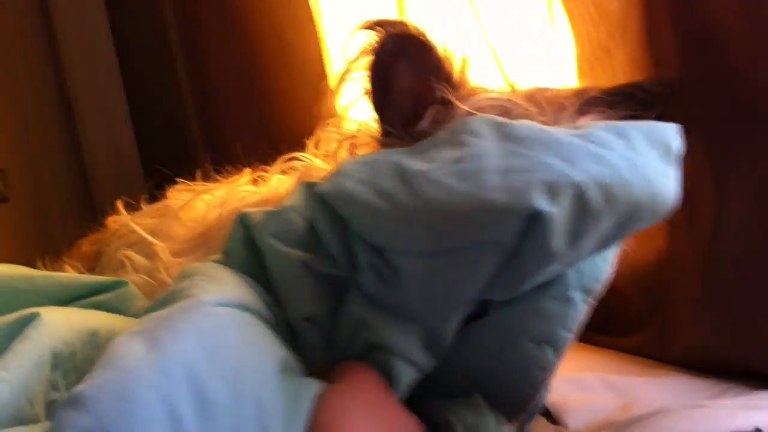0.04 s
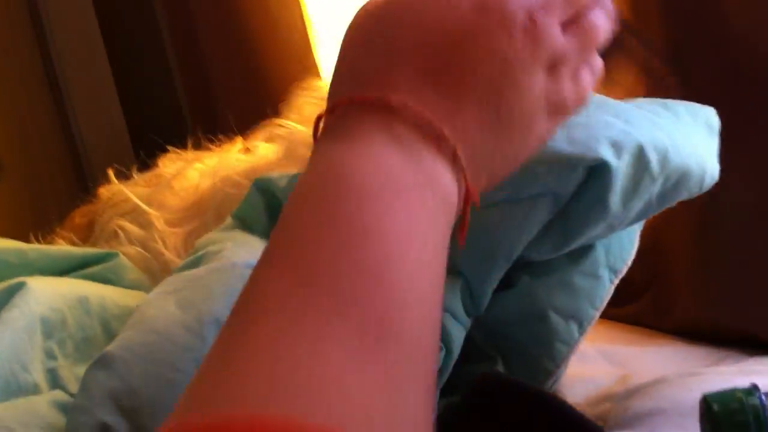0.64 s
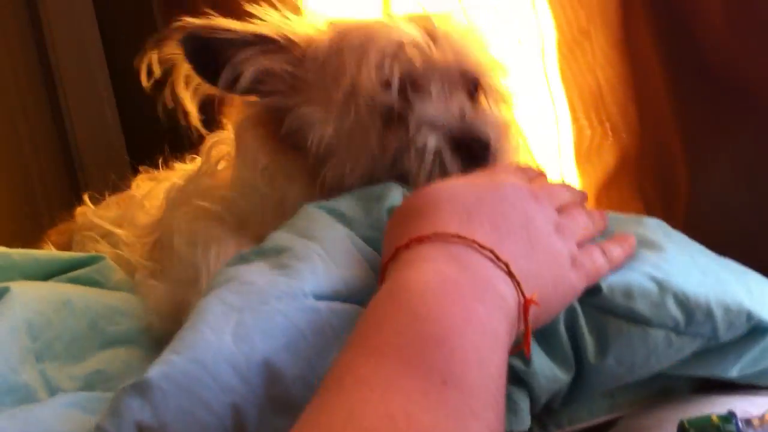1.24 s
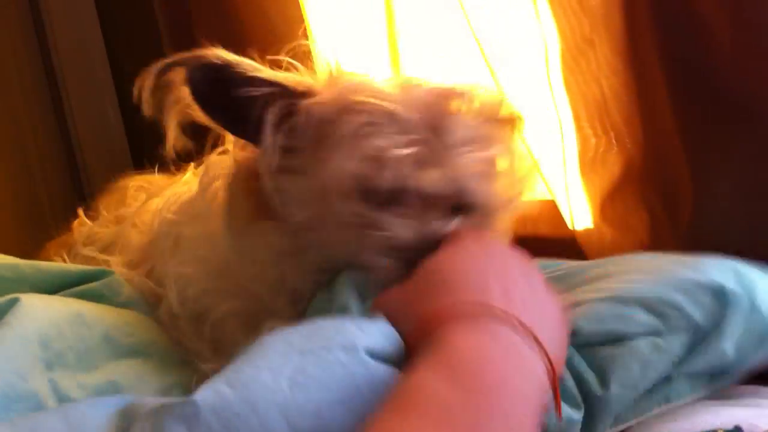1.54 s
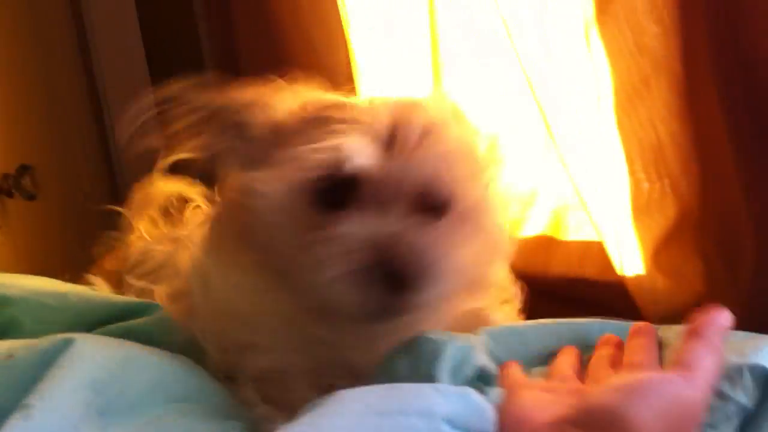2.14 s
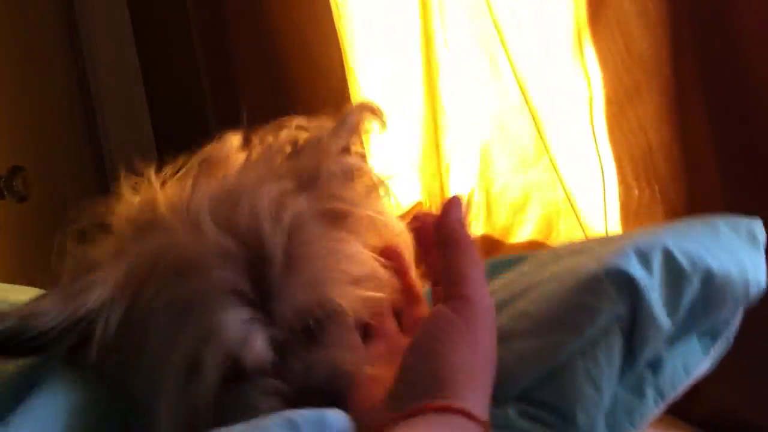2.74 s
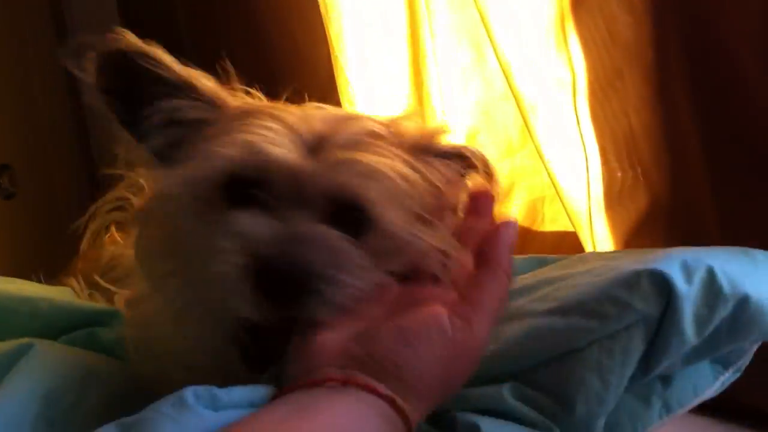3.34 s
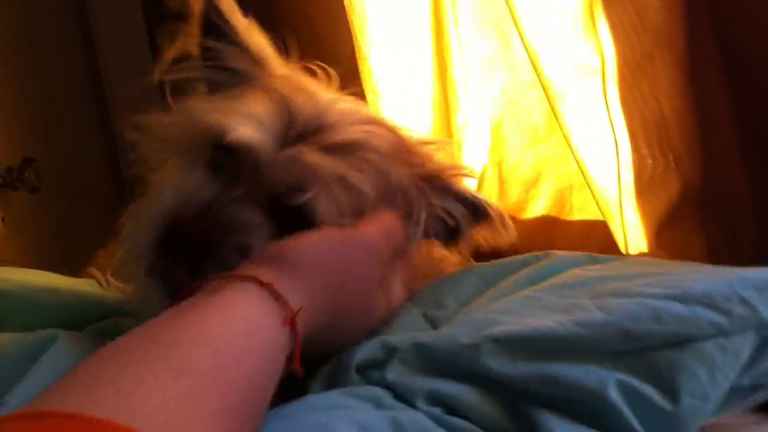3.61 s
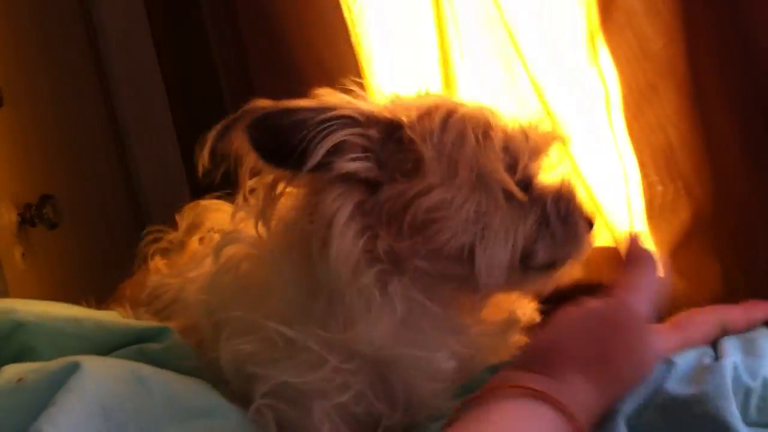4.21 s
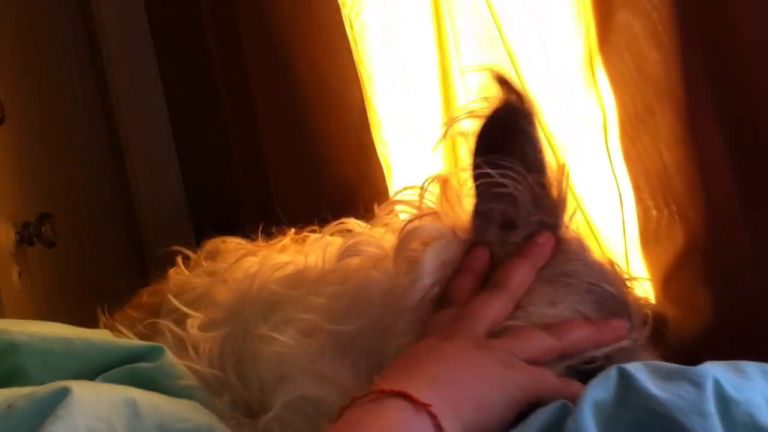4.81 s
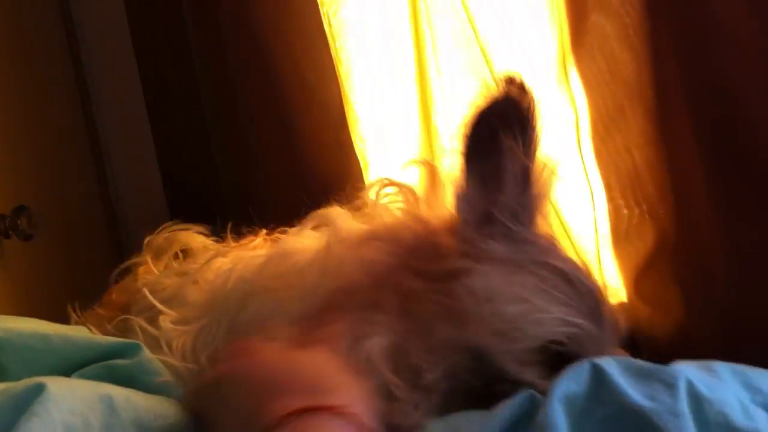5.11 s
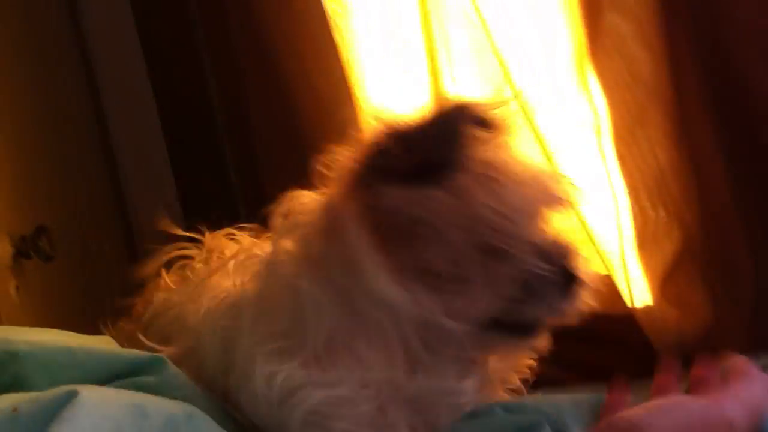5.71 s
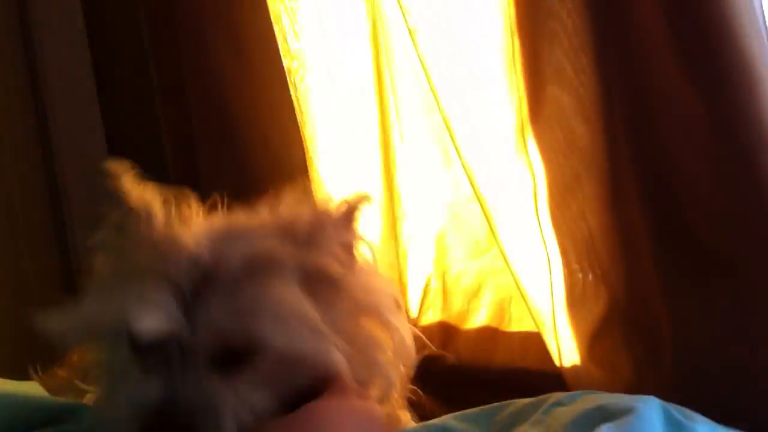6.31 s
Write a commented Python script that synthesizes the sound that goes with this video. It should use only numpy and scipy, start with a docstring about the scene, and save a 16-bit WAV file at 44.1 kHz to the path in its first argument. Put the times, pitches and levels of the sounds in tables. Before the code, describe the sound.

A small dog gives two short, throaty play growls and a few snuffs while a hand softly rustles its fur and a quilt.

```python
"""A quiet bedroom: a small dog play-growls on the bed while a hand ruffles its fur and the quilt.
Each push of the growl is a run of throbs that slows as it goes; a throb is a few uneven vocal-fold
pulses. An opening jaw brightens the voice and lifted lips add a wet rasp between the teeth.
The dog also snuffs and gives one short hoarse huff; cloth swishes and ticks over a low room hum."""
import sys
import numpy as np
from scipy import signal
from scipy.fft import rfft, irfft, next_fast_len
from scipy.io import wavfile
from scipy.ndimage import uniform_filter1d

SR = 44100
rng = np.random.default_rng(int(sys.argv[2]) if len(sys.argv) > 2 else 0)


def int16_out(signal):
    """Quantize to a 16-bit WAV file."""
    q = np.round(np.clip(np.atleast_2d(signal).T, -1, 1) * 32767)
    wavfile.write(sys.argv[1], SR, q.astype(np.int16))


N = 280149
TIME = np.arange(N) / SR
CUTOFF_HZ = 15750


def from_db(db):
    return 10 ** (np.asarray(db) / 20)


def unit_rms(x):
    return x / np.sqrt(np.mean(x ** 2) + 1e-20)


def add(out, start_s, sound):
    i = int(start_s * SR)
    out[i:i + len(sound)] += sound[:N - i]


def cut(x, hz, kind, order=4):
    return signal.sosfilt(signal.butter(order, hz, kind, fs=SR, output="sos"), x)


def drift(rate_hz):
    """A random wobble, rms 1."""
    knots = rng.standard_normal(int(N / SR * rate_hz) + 2)
    return unit_rms(np.interp(TIME * rate_hz, np.arange(len(knots)), knots))


def noise(colour):
    """Noise shaped by an EQ curve and rolled off below its first point, rms 1."""
    hz, db = np.transpose(colour)
    size = next_fast_len(N)
    bins = np.maximum(np.fft.rfftfreq(size, 1 / SR), 1)
    gain = from_db(np.interp(np.log(bins), np.log(hz), db)) * np.minimum(bins / hz[0], 1) ** 2
    return unit_rms(irfft(rfft(rng.standard_normal(size)) * gain, size)[:N])


def resonate(x, modes):
    """Parallel resonators of alternating polarity."""
    out = 0
    for k, (hz, width, db) in enumerate(modes):
        r = np.exp(-np.pi * width / SR)
        poles = [1, -2 * r * np.cos(2 * np.pi * hz / SR), r * r]
        out = out + (-1) ** k * from_db(db) * (1 - r * r) / 2 * signal.lfilter([1, 0, -1], poles, x)
    return out


def linger(x, decay_s):
    """Give each click an exponential tail."""
    return signal.lfilter([1], [1, -np.exp(-1 / (decay_s * SR))], x)


def swell(start, attack, release, curve=1.0):
    """An envelope that rises to 1 and falls back to silence."""
    return np.interp(TIME, [start, start + attack, start + attack + release], [0, 1, 0]) ** curve


# EQ of the room's hiss: (frequency [Hz], gain [dB])
ROOM_HISS_EQ = [(15, -34), (25, -33), (35, -19), (49, -25), (55, -35), (116, -3), (148, 4), (198, -1),
                (267, 0.5), (421, -13.5), (552, -14.5), (631, -13.5), (1410, -18.5), (5430, -21.5),
                (15500, -26.5)]
# resonances of its hum: (centre [Hz], width [Hz], gain [dB])
ROOM_MODES = [(138.5, 16, 3.5), (204, 22, -8.5), (259.8, 22.4, -2)]


def room_tone(hum_db=-67, hiss_db=-62.5):
    """Low hum gathers in the room's resonances, under an even hiss."""
    hum = resonate(rng.standard_normal(N), ROOM_MODES)
    hum = cut(cut(hum, 435, "low"), 128, "high", order=8)
    return from_db(hum_db) * unit_rms(hum) + from_db(hiss_db) * noise(ROOM_HISS_EQ)


# EQs of the dull rub and the bright swish: (frequency [Hz], gain [dB])
RUB_EQ = [(200, -11), (380, -0.5), (800, -1), (1250, -4), (1700, -6), (2800, -10.5), (6000, -18),
          (9000, -45)]
SWISH_EQ = [(3000, 0.5), (4500, 1.5), (5700, 3), (7000, -0.5), (10000, 0.5), (13000, 0.5), (15500, -4)]
# strokes on fur and quilt: (start [s], attack [s], release [s], rub level [dB], swish re rub [dB])
HAND_STROKES = [(.05, 0.38, 0.074, -66, -1), (.49, 0.065, 0.015, -69, 4), (.79, 0.029, 0.23, -63.5, -4),
                (1.46, .04, 0.18, -68, -9), (1.61, 0.04, .68, -63.5, 1.5), (1.69, 0.056, 0.095, -55, -4.5),
                (1.95, 0.054, .07, -61.5, -1), (2.31, 0.16, 0.12, -64, -3), (3.28, .1, 0.21, -73.5, 6.5),
                (3.555, .015, 0.54, -67, 1), (3.88, 0.29, 0.16, -60, -2), (4.28, 0.017, 0.46, -65, 2),
                (4.5, 0.21, 0.043, -65.5, -7), (5.13, .075, .13, -70, 8.5),
                (5.24, 0.033, 0.045, -57.5, -10), (5.89, 0.093, 0.039, -58.5, -2),
                (5.98, .03, 0.23, -67.5, -6)]


def hand_strokes(grain_db=3.0, grain_hz=400):
    """Fibres catch and slip under the hand: a grainy rub with a finer swish on top."""
    rub_gain, swish_gain = 0, 0
    for start, attack, release, db, swish_db in HAND_STROKES:
        stroke = from_db(db) * swell(start, attack, release, curve=0.81)
        rub_gain = np.hypot(rub_gain, stroke)  # overlapping strokes add in power
        swish_gain = np.hypot(swish_gain, from_db(swish_db) * stroke)
    rub = noise(RUB_EQ) * unit_rms(from_db(grain_db * drift(grain_hz)))
    return rub_gain * rub + swish_gain * noise(SWISH_EQ)


# wisps of hiss: (start [s], attack [s], release [s], level [dB], centre [Hz], width [Hz])
THIN_HISSES = [(.79, 0.022, 0.1, -67, 5470, 900), (1.86, 0.037, .025, -61.5, 8700, 3000),
               (2.168, .027, .1, -65, 8800, 3000), (2.214, 0.027, .04, -56, 9500, 2800),
               (3.13, 0.094, 0.058, -57, 8360, 3500), (3.224, 0.029, 0.016, -56, 5000, 2430),
               (5.5, 0.11, 0.089, -57.5, 6170, 750), (5.52, 0.16, 0.14, -66, 2800, 1300)]


def thin_hisses():
    """Air and sliding fur make narrow bands of noise that swell and fade."""
    out = np.zeros(N)
    for start, attack, release, db, hz, width in THIN_HISSES:
        band = cut(rng.standard_normal(N), [hz - width / 2, hz + width / 2], "band", order=2)
        out += from_db(db) * swell(start, attack, release) * unit_rms(band)
    return out


# ticks of cloth and lips: (time [s], peak level [dB], centre [Hz], crackle decay [s])
SMALL_TICKS = [(1.799, -50, 590, 0.0022), (2.007, -43, 3000, .003), (3.572, -48, 3600, .002),
               (3.793, -41.5, 1160, .003), (3.882, -42.5, 6100, 0.002), (4.127, -45.5, 880, 0.0013),
               (4.197, -45.5, 2240, .0018), (4.316, -45, 1700, 0.0026), (4.337, -41, 880, 0.00085),
               (4.857, -50.5, 815, 0.0043), (5.799, -34.5, 836.6, .0025), (5.814, -40, 1100, 0.0024),
               (5.994, -38, 4480, 0.0029), (6.084, -48, 630, .0043)]


def ticks(crackle=0.2):
    """A cloth fold snaps or a lip parts: a soft click and a tiny crackle in one broad resonance."""
    out, t = np.zeros(N), TIME[:SR // 25]
    for start, db, hz, decay_s in SMALL_TICKS:
        force = (t == 0) + crackle * rng.standard_normal(len(t)) * np.exp(-t / decay_s)
        ring = resonate(force, [(hz, hz, 0)])
        snap = cut(ring, min(1.25 * hz, CUTOFF_HZ), "low")
        add(out, start, from_db(db) * snap / np.abs(snap).max())
    return out


# formants of the open mouth: (centre [Hz], width [Hz], gain [dB])
HUFF_FORMANTS = [(620, 64, -14), (930, 66, -5), (1170, 37, 3.5), (1635, 70, -7), (1800, 81, -5.5),
                 (2240, 170, -11), (3310, 220, -14), (4500, 450, -20.5)]


def huff(start_s=2.005, hold_s=0.06, level_db=-48.5, burst_db=3, burst_s=0.006, fade_db_per_s=480):
    """Fluttering air rings the open mouth without voice: a burst, a hold and a fast fade."""
    air = rng.standard_normal(N) * from_db(3 * drift(rate_hz=340))
    breath = cut(cut(resonate(air, HUFF_FORMANTS), 4000, "low"), 500, "high", order=2)
    levelled = breath / np.sqrt(uniform_filter1d(breath ** 2, size=SR // 100) + 1e-20)
    age = np.clip(TIME - start_s, 0, 1)
    db = level_db + burst_db * np.exp(-age / burst_s) - fade_db_per_s * np.maximum(age - hold_s, 0)
    return (age > 0) * from_db(db) * levelled


# the voice's automation, bout by bout: (time [s], effort [dB], jaw opening [0-1], lip lift [0-1])
GRUNT_KEYS = [(2.198, -43.5, 0.57, 0.81), (2.241, -42, 0.08, 1)]
FIRST_GROWL_KEYS = [(2.508, -42, 0.8, 0.93), (2.544, -38.5, 0.69, 0.73), (2.62, -41, .75, 0.96),
                    (2.70, -34.5, 0.53, 0.33), (2.785, -43, 0.62, 0.72), (2.857, -43, .3, 0.8),
                    (2.896, -36, 0.44, 0.29), (2.98, -40, 0.9, .85), (3.07, -37, .05, .65),
                    (3.168, -40, 0.19, 0.61), (3.221, -43.5, .4, 1)]
MUTTER_KEYS = [(4.865, -57, .3, .35)]
SECOND_GROWL_KEYS = [(5.199, -40.5, .1, .3), (5.274, -47.5, 0.74, 0.42), (5.314, -38.5, 0.11, .1),
                     (5.40, -38, 0.46, 0.14), (5.484, -41.5, 0.94, 0.91), (5.563, -37.5, 0.81, 0.67),
                     (5.61, -35.5, 0.65, 0.38), (5.655, -37, 0.44, 0.51), (5.756, -39, 0.54, 0.58),
                     (5.81, -51, 0.6, .5)]
# pushes of the growl: (start [s], duration [s], first throb spacing [s], slowing [s per throb],
# first throb's length [s], shortest pause [s], base pulse rate [Hz])
GROWL_PUSHES = [(2.197, 0.052, 0.041, .001, 0.0032, .02, 138),
                (2.508, .296, .0356, .0014, 0.0026, .021, 113.3),
                (2.856, .335, .0395, .0016, 0.0073, .022, 119.8),
                (3.222, 0.0069, .04, .001, .008, .02, 109.4), (4.865, .022, .04, .001, 0.021, .018, 117),
                (5.2, .222, 0.035, .0022, 0.0037, 0.026, 120.1),
                (5.448, 0.4, .0355, .0028, .011, 0.018, 113.2)]


def throbs(growth_s=0.0087, jaw_lift_hz=20, sag_hz_per_s=50):
    """Throbs lengthen and spread out through a push; their pitch sags, and an open jaw lifts it."""
    key_times, *lanes = np.transpose(GRUNT_KEYS + FIRST_GROWL_KEYS + MUTTER_KEYS + SECOND_GROWL_KEYS)
    for start, duration, spacing, slowing, first_length, pause, base_hz in GROWL_PUSHES:
        age, k = 0, 0
        while age < duration:
            effort_db, jaw, lips = (np.interp(start + age, key_times, lane) for lane in lanes)
            period = spacing + slowing * k
            length = min(first_length + growth_s * k, period - pause, duration - age)
            hz = base_hz + jaw_lift_hz * jaw - sag_hz_per_s * age
            yield start + age, length, hz, effort_db, jaw, lips
            age, k = age + period, k + 1


def fold_pulses(length, hz, chance, jitter, shimmer_db=1.4):
    """The few uneven closures of the vocal folds in one throb, with silence to ring into."""
    cycle = np.arange(min(int(np.rint(length * hz)) + 1, chance.shape[1]))
    times = (cycle + (cycle > 0) * jitter * chance[0, cycle]) / hz
    pulses = np.zeros(SR // 5)
    pulses[(times * SR).astype(int)] = from_db(shimmer_db * chance[1, cycle])
    return pulses


# formants of the growl: (centre [Hz], width [Hz], gain [dB])
CHEST_FORMANTS = [(136.8, 30.2, 0.5), (223, 36.5, 3), (331, 60, -6)]
THROAT_FORMANTS = [(393, 100, 7.5), (537, 120, -5.5), (607, 190, -6.5)]
MOUTH_FORMANTS = [(880, 430, -3.5), (1113, 204, 2), (1294, 250, -4)]
# EQ of wet air between the teeth: (frequency [Hz], gain [dB])
RASP_EQ = [(1500, -18), (2200, -5.5), (2800, -2.5), (3500, -9.5), (4700, -7.5), (5400, -5), (6100, 1.5),
           (7000, -4), (8100, 0), (8900, -6), (10000, -3.5), (12000, -12), (15500, -21)]


def growl(kick=0.84, chest_lag=0.31, onset_s=0.0049, leak=0.23, turbulence=0.2,
          ring_s=0.0054, hold_s=0.015, damping_s=0.025):
    """Each vocal-fold closure rings chest, throat and mouth, and lets through a puff of hissing air."""
    out, air = np.zeros(N), noise(RASP_EQ)
    chances = rng.standard_normal((64, 2, 16))  # throb, timing or level, pulse
    for (start, length, hz, effort_db, jaw, lips), chance in zip(throbs(), chances):
        # the folds beat more unevenly as the jaw opens
        pulses = fold_pulses(length, hz, chance, jitter=0.045 + 0.04 * jaw ** 2)
        t = TIME[:len(pulses)]
        # pressure built up in the pause sharpens the first closure; the chest takes a moment to swell
        onset = np.exp(-t / onset_s)
        sharp = pulses * (1 + kick * onset)
        swelling = pulses * (1 - chest_lag * onset)
        # some air keeps leaking between closures
        puffs = linger(sharp, decay_s=0.00083) + leak * linger(sharp, decay_s=0.023)
        rough = sharp + turbulence * puffs * rng.standard_normal(len(t))
        chest = cut(resonate(swelling, CHEST_FORMANTS), 513, "low")
        throat = cut(resonate(pulses, THROAT_FORMANTS), 750, "low")
        mouth = cut(resonate(rough, MOUTH_FORMANTS), 1330, "low")
        rasp = linger(puffs, decay_s=0.0004) * air[int(start * SR):][:len(t)]
        # levels in dB re the chest: jaw and lips fade up the brighter layers
        layers = [(chest, 0), (throat, -28 + 32.5 * jaw),
                  (mouth, -33.5 + 4 * jaw + 21 * lips), (rasp, -34.5 + 20 * lips)]
        # the throb's energy scales with its length plus the last ring
        length_gain = np.sqrt((length + ring_s) * SR / len(t))
        # the slack throat damps the ring once the pulses stop
        damping = np.exp(-np.maximum(t - length - hold_s, 0) / damping_s)
        for layer, layer_db in layers:
            damped = damping * cut(layer, 105, "high", order=5)
            add(out, start, length_gain * from_db(effort_db + layer_db) * unit_rms(damped))
    return out


# snuffs: (start [s], attack [s], release [s], level [dB])
NOSE_SNUFFS = [(2.2, 0.095, 0.025, -53), (3.735, 0.051, 0.095, -47.5), (5.57, 0.072, 0.19, -57),
               (5.785, 0.082, 0.059, -49)]
# their EQ: (frequency [Hz], gain [dB])
SNUFF_EQ = [(290, -25), (500, -5), (997, -4.5), (1150, 0.5), (1510, -12), (1670, -6), (2720, -7.5),
            (3280, -6.5), (5590, -4), (6640, -9), (8360, -5), (13000, -7.5), (15500, -17.5)]


def snuffs():
    """Short, smooth jets of air through the dog's nose."""
    envelope = sum(from_db(db) * swell(start, attack, release, curve=1.09)
                   for start, attack, release, db in NOSE_SNUFFS)
    return envelope * noise(SNUFF_EQ)


def bedroom_reverb(x, wet_db=-16, t60_s=0.29, predelay_s=0.006):
    """A short, dull tail from a room full of soft things."""
    t = TIME[:SR // 2]
    dull_noise = cut(rng.standard_normal(len(t)), 4600, "low", order=1)
    tail = dull_noise * from_db(-60 * t / t60_s) * (t > predelay_s)
    return from_db(wet_db) * signal.fftconvolve(x, tail / np.linalg.norm(tail))[:N]


def scene():
    """Dog and bedding up close, with a touch of reverb over the room tone, in mono."""
    close = growl() + huff() + snuffs() + thin_hisses() + hand_strokes() + ticks()
    return (close + bedroom_reverb(close) + room_tone())[None]


def record(dry):
    """A steep low-pass takes off the very top."""
    return signal.sosfilt(signal.ellip(10, 0.2, 70, CUTOFF_HZ, fs=SR, output="sos"), dry)


dry = scene()
out = record(dry)
int16_out(out)
```